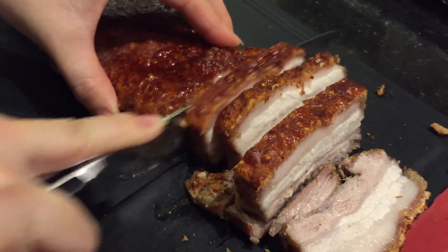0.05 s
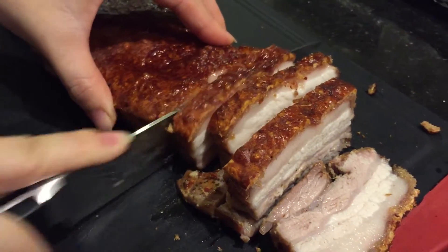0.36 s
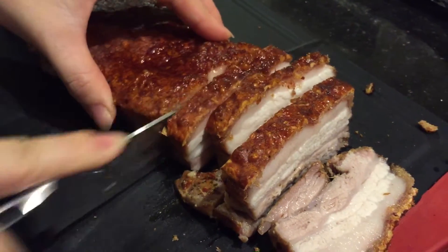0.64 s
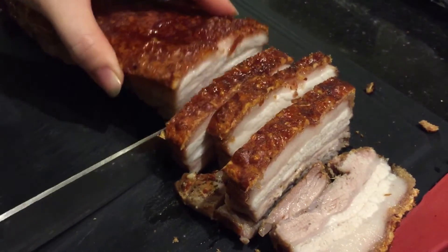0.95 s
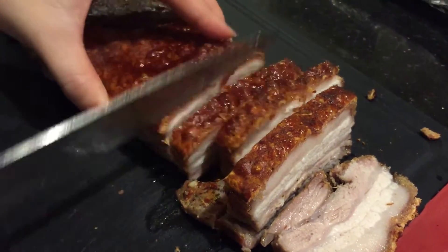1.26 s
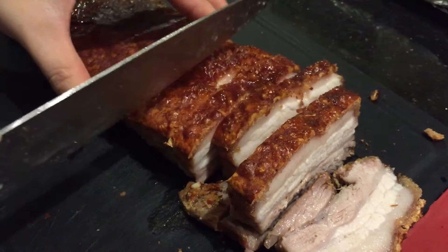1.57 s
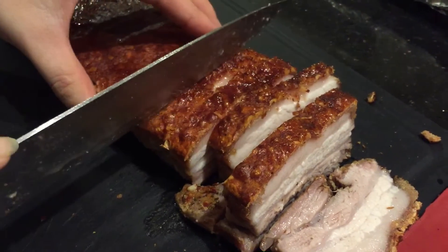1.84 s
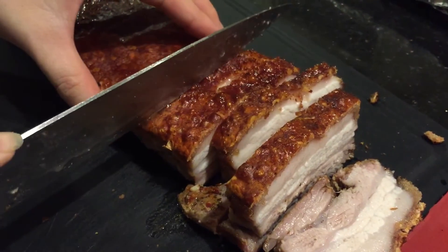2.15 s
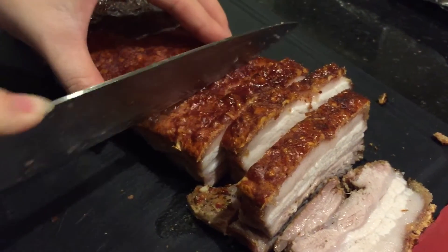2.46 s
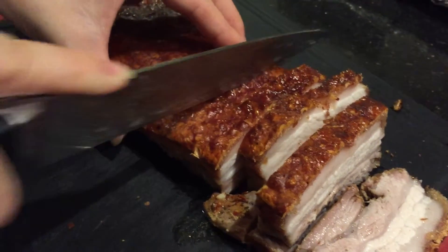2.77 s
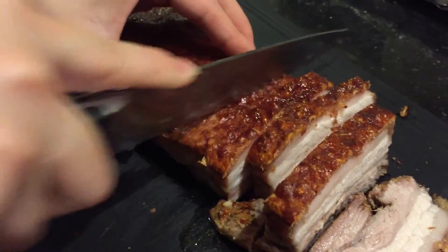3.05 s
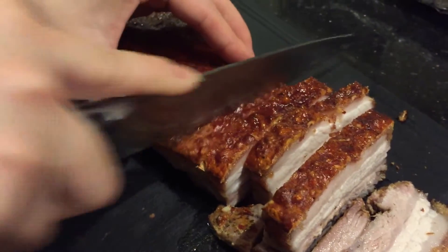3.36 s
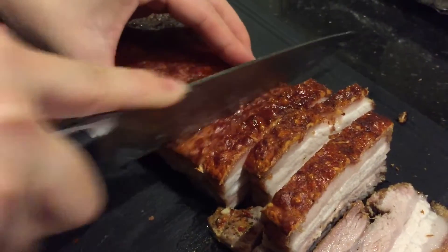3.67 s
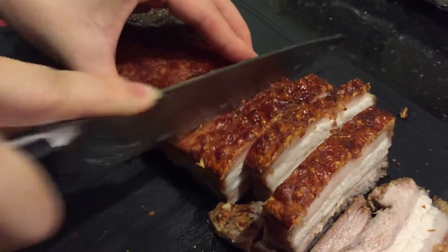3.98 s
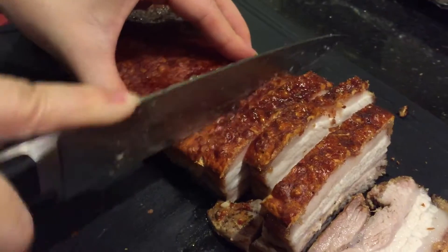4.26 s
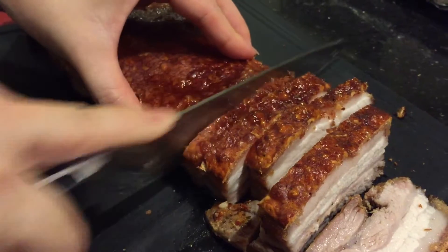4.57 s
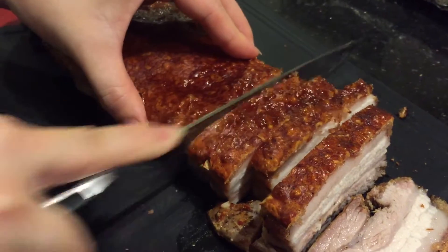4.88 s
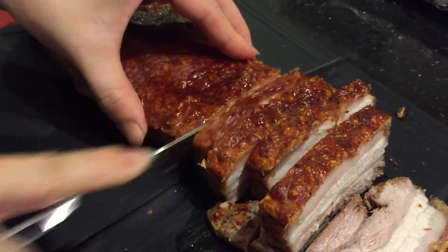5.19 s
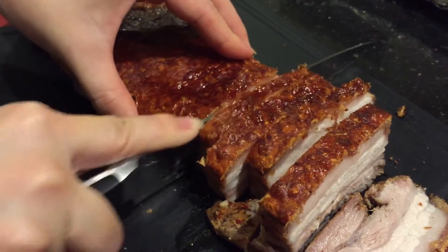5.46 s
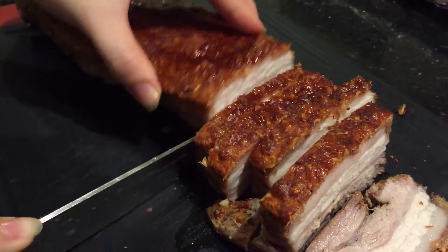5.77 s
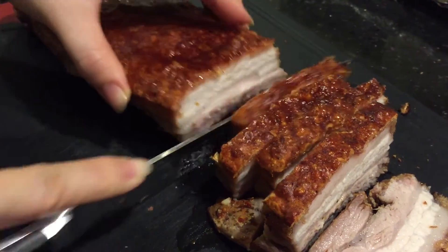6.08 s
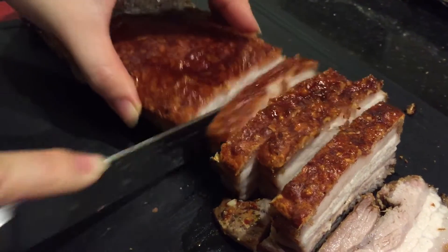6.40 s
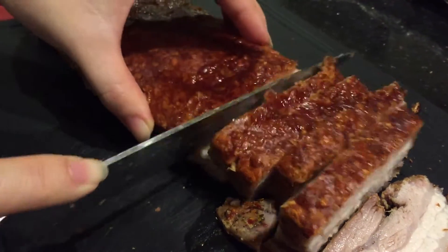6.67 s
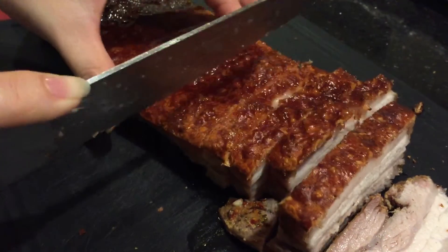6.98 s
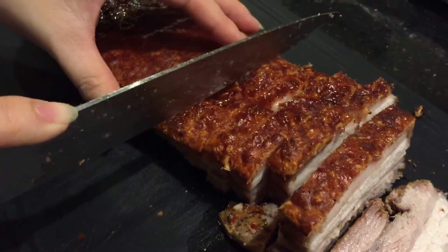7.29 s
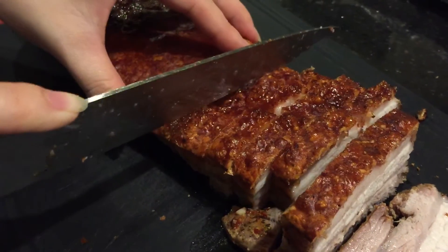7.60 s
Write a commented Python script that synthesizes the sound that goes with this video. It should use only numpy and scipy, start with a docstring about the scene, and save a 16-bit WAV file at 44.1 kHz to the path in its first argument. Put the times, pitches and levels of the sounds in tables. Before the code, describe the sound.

Close, brittle crunching as a kitchen knife slices roast pork crust, with soft moist strokes, light board knocks and blade taps.

```python
"""A home kitchen, close to a cutting board: a large knife saws through crisp pork crackling.
The blade goes to and fro about three times a second. The crust fails by brittle fracture, in snaps and
crunch; then the strokes slide through soft meat and along the board, with stick-slip friction.
Impacts excite the damped modes of steel and wood, and the edge is set on the crust for the next slice.
A low appliance hum fills the room."""
import sys
import numpy as np
from scipy import signal
from scipy.fft import rfft, irfft, next_fast_len
from scipy.io import wavfile

SR = 44100
rng = np.random.default_rng(int(sys.argv[2]) if len(sys.argv) > 2 else 0)


def persist_wave(psi):
    """Save psi, clipped to +-1, as 16-bit WAV."""
    counts = np.round(np.clip(psi, -1, 1) * 32767).astype(np.int16)
    wavfile.write(sys.argv[1], SR, np.atleast_2d(counts).T)


N = 336924
TIME = np.arange(N) / SR
BODY_EDGE_HZ, FIZZ_EDGE_HZ = 2500, 7500   # three registers: body below, bite between, fizz above

# spectrum of the appliance rumble: f/Hz, relative density/dB
RUMBLE_SPECTRUM = [(20, -32), (40, -18.5), (60, -9.5), (95, -8.5), (130, 0), (170, 2), (220, -1.5),
                   (330, -9), (520, -17), (1200, -17), (2200, -24.5), (5000, -30), (10000, -36),
                   (16000, -37)]
# narrow bands of appliance drone: f/Hz, width/Hz, level/dB
DRONE_BANDS = [(91, 12, -70.5), (155.5, 14, -65), (169.6, 8, -61), (287, 9.9, -70), (346.2, 6.7, -74),
               (414.8, 62, -69)]
# faint tones from elsewhere in the kitchen: start/s, end/s, f/Hz, level/dB
WHINES = [(2.27, 2.542, 346, -55), (3.28, 3.605, 345, -55.5), (6.86, 7.19, 409.3, -56),
          (7.33, 7.8, 408, -53)]
# strokes through meat and over the board:
# t at top speed/s, relative bite level/dB, duration/s, body re bite/dB, fizz re bite/dB
SLIDE_STROKES = [(0.02, -45, 0.17, -1.5, -2), (0.182, -54, 0.19, 3, 0), (0.351, -54.5, 0.21, -1, -5.5),
                 (0.534, -56, .17, 4, -6.5), (0.803, -60, 0.51, 1, 1.5), (1.105, -65.5, 0.54, -18, -8.5),
                 (1.32, -61.5, 0.12, 3.5, 5.5), (4.63, -48.5, .32, -9.5, -4.5),
                 (4.798, -46, 0.12, -3.5, -3), (4.976, -56, 0.24, -3, 1), (5.129, -49, .15, 1, -1),
                 (5.303, -51, 0.16, -2, -4), (5.465, -57, 0.21, 0, -7), (5.721, -52.5, 0.28, 0.5, -5.5),
                 (6.13, -69, .3, 12, 3), (6.441, -69.5, 0.22, 17.5, 0)]
# resonances of the wet slit between blade and meat, at half speed: f/Hz, width/Hz, relative level/dB
SLIT_MODES = [(977, 69, -6.5), (1448, 130, 0), (1840, 82, -2.5), (3516, 340, 6.5), (4190, 230, 7.5)]
# squeals of the blade drawn out of the cut: t/s, f/Hz, level/dB, Gaussian width/s
SQUEALS = [(0.837, 2950, -61.5, 0.028), (.967, 4350, -61, 0.043), (1.08, 2380, -67.5, 0.16)]
# bursting blisters of crust: t/s, relative bite level/dB, body re bite/dB, fizz re bite/dB
BLISTERS = [(0.0262, -35, -21, 7), (0.16, -51, 4, 8), (0.367, -50.5, -8, -5), (2.34, -42.5, -12, -1),
            (2.389, -45, -12, 3.5), (2.4586, -30, -6, 5), (2.505, -44, -3.5, 1), (2.562, -43, -5, 9),
            (2.5758, -40.5, -1.5, 13), (2.5956, -32.5, 0.5, 14.5), (2.6235, -41.5, 0.5, 10),
            (2.662, -39, -15, 12), (2.75, -43.5, -22, 3.5), (2.7672, -45.5, -22, 6),
            (2.8067, -28, -14.5, 4.5), (2.8598, -23, -3.5, -6.5), (2.9206, -37, -15, 7.5),
            (3.0275, -27.5, -12.5, 5.5), (3.092, -35.5, -5.5, 1), (3.1026, -33.5, -11.5, 5.5),
            (3.1338, -13, -7, -4.5), (3.1646, -32, -13, 5), (3.1692, -28.5, -13.5, 2.5),
            (3.1846, -24, -13, 3.5), (3.2208, -51, -8, 3), (3.2774, -40.5, -14, -6), (3.288, -32.5, -10, 2),
            (3.2985, -25.5, -13, 8), (3.3113, -22, -7.5, -1), (3.326, -23, -16, 1), (3.4364, -27, -11, 2.5),
            (3.49, -28, -4.5, -12), (3.5995, -27, -8, -2), (3.707, -41.5, -10.5, -1),
            (3.7322, -32.5, 1.5, 6.5), (3.7465, -26, -1, 8), (3.785, -24.5, -14.5, 9),
            (3.8044, -15.5, -14, -3), (3.8645, -24.5, -7.5, 5.5), (3.928, -34.5, -21.5, 4),
            (4.1014, -35.5, -9, 4), (4.1408, -22, -21.5, -5), (4.1613, -17.5, -5, 2.5),
            (4.2654, -40.5, -20, 9), (4.415, -28.5, -11.5, 10.5), (4.432, -36.5, -14, 12),
            (4.491, -27, -13, 4.5), (4.5014, -23.5, -20.5, 4), (4.5182, -26.5, -1.5, 7),
            (4.528, -19, -16, -7), (5.3427, -44.5, -14, 8.5), (5.8146, -50, -9, 2.5), (6.179, -54.5, -1, 7),
            (6.4295, -67, -9, 23.5), (6.7272, -60, -15, 12), (6.9872, -57, 0, -6), (7.476, -51, -8, 8),
            (7.492, -40, -7, 8.5), (7.5312, -35, -12, 5.5), (7.614, -40.5, -14, 15.5)]
# resonances of the blade wedged in the crust: f/Hz, width/Hz, boost/dB
WEDGE_MODES = [(1754, 77, 8.5), (3254, 180, 13), (4155, 400, 7.5), (5740, 1200, 7), (9530, 500, 3),
               (13100, 910, 3.5), (15200, 420, 9)]
# knocks of knife and meat on the board: t/s, level/dB
KNOCKS = [(.0286, -42.5), (.1776, -41.5), (1.335, -44), (2.1655, -50.5), (2.4591, -42), (2.5951, -41),
          (2.8068, -33.5), (2.8603, -38), (3.1347, -27.5), (3.747, -33.5), (4.1614, -33.5), (6.387, -46),
          (6.392, -45), (6.409, -48.5), (7.533, -42.5), (7.6138, -38.5)]
# modes of the board: f/Hz, relative level/dB, T60/s
BOARD_MODES = [(422, -8, .05), (580, -11, .033), (790, -1.5, 0.02), (963, -6.5, 0.068), (1230, -4.5, .04),
               (1820, 0, .04), (2522, -10, .029), (3200, -4, .028)]
# the blade's weight coming down through the meat: t/s, level/dB, Gaussian width/s
THUDS = [(.03, -60.5, 0.061), (3.185, -57.5, 0.068), (3.75, -62.5, 0.08), (4.146, -55.5, .045),
         (4.536, -45.5, 0.022), (4.8, -50.5, 0.038)]
# taps of the edge on hard crust: t/s, level/dB
TAPS = [(1.3732, -46.5), (2.048, -60.5), (2.1655, -48.5), (2.389, -63), (2.4591, -42), (7.3624, -44.5),
        (7.4619, -40), (7.4918, -33), (7.5324, -30)]
# modes of the steel blade: f/Hz, relative level/dB, T60/s
BLADE_MODES = [(3160, -30, .06), (4110, -6.5, 0.062), (4800, -13, 0.064), (5879, -16, .06),
               (6684, -14, 0.069), (7780, -11, 0.061), (8900, -15, 0.067), (9900, -12, 0.057),
               (11330, -5, 0.054), (13300, 2, .04), (15000, -4, .052)]
# strokes through the crust: t at top speed/s, level/dB, rise/s, fall/s
SAW_STROKES = [(2.35, -55.5, 0.075, 0.17), (2.48, -52.5, 0.043, 0.15), (2.6, -38.5, 0.049, 0.063),
               (2.67, -55, 0.045, 0.22), (2.83, -40, 0.054, 0.19), (3.035, -44.5, 0.063, 0.033),
               (3.17, -29.5, 0.11, 0.14), (3.32, -35, 0.044, 0.097), (3.485, -33, .1, 0.089),
               (3.636, -33.5, 0.078, 0.076), (3.764, -29, 0.05, 0.15), (3.95, -34.5, 0.065, .1),
               (4.147, -28.5, .11, 0.065), (4.31, -37, 0.2, 0.085), (4.506, -28.5, .12, 0.067)]
# spectrum of the crunch ahead of the wedge resonances: f/Hz, relative density/dB
CRUNCH_SPECTRUM = [(100, -7), (300, -7), (800, -5.5), (1500, -5), (2300, -3), (3200, -6), (5000, -4.5),
                   (6800, -3.5), (8200, -2), (10500, -3.5), (12000, 1), (16000, -7.5)]
# envelope of the greasy blade peeling off the meat: t/s, level/dB
PEEL_ENVELOPE = [(6.48, -81), (6.57, -57), (6.66, -64.5), (6.73, -57.5), (6.9, -72), (7.35, -91.5)]


def from_db(db):
    """Amplitude ratio: a factor of ten per 20 dB."""
    return 10 ** (np.asarray(db) / 20)


def rms_one(x):
    """Normalisation to rms 1."""
    return x / np.sqrt(np.mean(x ** 2) + 1e-20)


def add(out, sound, s):
    """Superposition of a short sound, starting at s seconds."""
    at = int(s * SR)
    out[at:at + len(sound)] += sound[:N - at]


def band(x, edges_hz, kind, order=2):
    """Causal Butterworth filtering."""
    return signal.sosfilt(signal.butter(order, edges_hz, kind, fs=SR, output="sos"), x)


def registers(x, lowest_hz):
    """Band splitting into body, bite and fizz."""
    body = band(band(x, lowest_hz, "high", order=1), BODY_EDGE_HZ, "low", order=4)
    bite = band(x, [BODY_EDGE_HZ, FIZZ_EDGE_HZ], "band", order=3)
    return body, bite, band(x, FIZZ_EDGE_HZ, "high", order=4)


def colour(x, spectrum):
    """Spectral shaping by a curve interpolated in log frequency."""
    hz, db = np.transpose(spectrum)
    size = next_fast_len(N)
    log_hz = np.log(np.arange(size // 2 + 1) * SR / size + 1)
    gain = from_db(np.interp(log_hz, np.log(hz), db))
    return irfft(rfft(x, size) * gain, size)[:N]


def drift(rate_hz):
    """Low-pass noise: a slow random wander of rms 1."""
    step, settle = 20, 4000
    pole = np.exp(-2 * np.pi * rate_hz * step / SR)
    noise = rng.standard_normal(N // step + settle + 2)
    slow = signal.lfilter([1], [1, -2 * pole, pole * pole], noise)[settle:]
    return np.interp(np.arange(N) / step, np.arange(len(slow)), rms_one(slow))


def narrow_noise(hz, width_hz):
    """Narrow-band noise, wavering as its components beat; rms 1."""
    edges_hz = [hz - width_hz / 2, hz + width_hz / 2]
    return rms_one(band(rng.standard_normal(N + SR), edges_hz, "band")[SR:])


def swell(s, width_s):
    """Gaussian envelope centred on s seconds."""
    return np.exp(-.5 * ((TIME - s) / width_s) ** 2)


def stroke(s, rise, fall):
    """Reciprocating motion: blade speed goes from rest to 1 and back in two quarter cosines."""
    phase = (TIME - s) / np.where(TIME < s, rise, fall)
    return np.where(np.abs(phase) < 1, np.cos(np.pi / 2 * phase), 0)


def grains(per_s, spread_db, t60, spike):
    """Poisson process of tiny ruptures, mostly weak, each a click and a decaying puff; rms 1."""
    sizes = from_db(spread_db * np.minimum(rng.exponential(1, N), 4)) * rng.choice([-1, 1], N)
    clicks = sizes * (rng.random(N) < per_s / SR)
    energy_decay = from_db(-60 / (t60 * SR)) ** 2
    energy = signal.lfilter([1], [1, -energy_decay], clicks ** 2 + 1e-18)
    return rms_one(spike * clicks + np.sqrt(energy) * rng.standard_normal(N))


def appliances(rumble_db, fade_s):
    """Background noise: broadband rumble, narrow-band drone and phase-modulated whines."""
    rumble = from_db(rumble_db) * rms_one(colour(rng.standard_normal(N), RUMBLE_SPECTRUM))
    drone = sum(from_db(db) * narrow_noise(hz, width_hz) for hz, width_hz, db in DRONE_BANDS)
    waver = .5 * drift(4)
    whines = np.zeros(N)
    for start, end, hz, db in WHINES:
        fade = np.clip(np.minimum(TIME - start, end - TIME) / fade_s, 0, 1)
        whines += from_db(db) * fade * np.sin(2 * np.pi * hz * TIME + waver)
    return rumble + drone + whines


def squelch(patchy_db, count=30):
    """Friction noise: the patches that cling keep changing, so bands swell and fade independently."""
    noise = rng.standard_normal(N)
    edges_hz = np.linspace(np.sqrt(450), np.sqrt(16500), count + 1) ** 2
    bands = (band(np.roll(noise, k * SR // 100), edges_hz[k:k + 2], "band") for k in range(count))
    return rms_one(sum(b * from_db(patchy_db * drift(21.3)) for b in bands))


def slit(speed, patchy_db, glide):
    """Cavity resonance: the wet slit sings, higher the faster the blade drags through it; rms 1."""
    song = sum(from_db(db + patchy_db * drift(28)) * narrow_noise(hz, width_hz)
               for hz, width_hz, db in SLIT_MODES)
    pitch_ratio = 1 + glide * (speed - .5)
    return rms_one(np.interp(np.cumsum(pitch_ratio), np.arange(N), song))


def sliding(gain_db, judder_db, speed_power):
    """Stick-slip friction: moist meat grips and frees the blade in a rub with ticks and faint squeals."""
    speeds = [stroke(s, length / 2, length / 2) for s, _, length, _, _ in SLIDE_STROKES]
    rub = squelch(patchy_db=3.9)
    song = from_db(-8.5) * slit(sum(speeds), patchy_db=5.5, glide=.14)
    ticks = from_db(-5.5) * grains(per_s=220, spread_db=5.5, t60=.005, spike=4)
    friction = band(rub + song + ticks, 6400, "low", order=1)
    body, bite, fizz = map(rms_one, registers(friction, lowest_hz=450))
    strokes = np.zeros(N)
    for speed, (_, db, _, body_db, fizz_db) in zip(speeds, SLIDE_STROKES):
        timbre = from_db(body_db) * body + bite + from_db(fizz_db) * fizz
        strokes += from_db(db) * speed ** speed_power * timbre
    squeals = sum(from_db(db) * swell(s, width_s) * narrow_noise(hz, 380) * from_db(3 * drift(30))
                  for s, hz, db, width_s in SQUEALS)
    return from_db(gain_db + judder_db * drift(45)) * strokes + squeals


def snap(t60, spike, flake_db):
    """Brittle fracture: a sharp release, a decaying shatter, three ringing flakes, a blade reflection."""
    t = TIME[:SR // 20]
    shatter = rng.standard_normal(len(t)) * from_db(-60 * t / t60)
    shatter[0] += spike * rng.choice([-1, 1])
    flakes_hz = rng.uniform([2800, 6000, 10500], [6000, 10500, 15000])
    flakes = sum(signal.lfilter(*signal.iirpeak(hz, Q=8, fs=SR), shatter) for hz in flakes_hz)
    direct = shatter + from_db(flake_db) * flakes
    delay_s = rng.uniform(.0002, .0008)
    return direct + .5 * np.interp(t - delay_s, t, direct, left=0)


def wedge(x):
    """Resonance: the blade wedged in the crust reinforces fixed bands of a fracture."""
    for hz, width_hz, boost_db in WEDGE_MODES:
        resonance = signal.lfilter(*signal.iirpeak(hz, hz / width_hz, fs=SR), x)
        x = x + (from_db(boost_db) - 1) * resonance
    return x


def cracks(fractures, gain_db, t60):
    """Acoustic emission: the crust bursts piece by piece, each with its own body, bite and fizz."""
    out = np.zeros(N)
    attack = int(.005 * SR)   # the first 5 ms set each register's level
    for s, db, body_db, fizz_db in fractures:
        stretch = np.exp(.28 * rng.uniform(-1, 1))
        free = rng.uniform(0, .38)   # share that escapes the wedge resonances
        burst = snap(t60 * stretch, spike=2.2, flake_db=1)
        parts = registers(free * burst + (1 - free) * wedge(burst), lowest_hz=465)
        crack = sum(from_db(part_db) * part / np.std(part[:attack])
                    for part_db, part in zip((body_db, 0, fizz_db), parts))
        add(out, from_db(db + gain_db) * crack, s)
    return out


def strike(blows, modes, spread_db, scuff_db, scuff_t60):
    """Modal vibration of board or blade: each impact gives a scuff and excites every damped mode."""
    out = np.zeros(N)
    t = TIME[:SR // 4]
    scatter_db = spread_db * rng.standard_normal((len(blows), len(modes)))
    for (s, db), offsets_db in zip(blows, scatter_db):
        scuff = rms_one(band(rng.standard_normal(len(t)), [modes[0][0], modes[-1][0]], "band"))
        sound = scuff * from_db(scuff_db - 60 * t / scuff_t60)
        for k, (hz, mode_db, t60) in enumerate(modes):
            envelope = from_db(mode_db + offsets_db[k] - 60 * t / t60)
            sound += (-1) ** k * envelope * np.sin(2 * np.pi * hz * t)
        add(out, from_db(db) * sound, s)
    return out


def thuds():
    """Forced vibration: board and worktop give a soft, deep bump under the hand's push."""
    push = sum(from_db(db) * swell(s, width_s) for s, db, width_s in THUDS)
    bump = narrow_noise(75, width_hz=65) + from_db(-5) * narrow_noise(220, width_hz=140)
    return push * bump


def sawing(grit_db, crumb_db, speed_power):
    """Abrasion: the edge grinds off dense grit and sparser crumbs, louder as a power of its speed."""
    envelope = sum(from_db(db) * stroke(s, rise, fall) ** speed_power for s, db, rise, fall in SAW_STROKES)
    grit = from_db(grit_db) * grains(per_s=2200, spread_db=3.2, t60=.003, spike=2.8)
    crumbs = from_db(crumb_db) * grains(per_s=150, spread_db=6, t60=.01, spike=1.6)
    return envelope * rms_one(wedge(colour(grit + crumbs, CRUNCH_SPECTRUM)))


def chips(per_s, level_db, spread_db, body_db, fizz_db):
    """Random fracture: small chips fly while the edge saws the crust; rows as in BLISTERS."""
    start, end = SAW_STROKES[0][0], SAW_STROKES[-1][0]
    return [(rng.uniform(start, end), level_db + spread_db * rng.uniform(-1, 1), body_db, fizz_db)
            for _ in range(int(per_s * (end - start)))]


def peeling():
    """Adhesive failure: threads of fat part with sparse, tiny ticks as the blade lifts out."""
    s, db = np.transpose(PEEL_ENVELOPE)
    envelope = from_db(np.interp(TIME, s, db, left=-120, right=-120))
    ticks = grains(per_s=170, spread_db=3.6, t60=.006, spike=2)
    return envelope * rms_one(band(ticks, 5200, "high", order=1))


def kitchen(x, wet_db, t60, treble_t60):
    """Reverberation: diffuse reflections of a small room decay exponentially, the treble sooner."""
    t = TIME[:SR // 2]
    noise = rng.standard_normal(len(t))
    dull = band(noise, 6000, "low", order=1)
    tail = dull * from_db(-60 * t / t60) + (noise - dull) * from_db(-60 * t / treble_t60)
    tail *= t > .004   # delay of the first reflection
    return x + from_db(wet_db) * signal.oaconvolve(x, tail / np.linalg.norm(tail))[:N]


def scene():
    """Superposition of crust, meat, blade and board in the room, over the appliance hum."""
    small_chips = chips(per_s=8, level_db=-47.5, spread_db=5.5, body_db=-10.5, fizz_db=4)
    snaps = cracks(BLISTERS + small_chips, gain_db=-1.5, t60=.014)
    crunch = sawing(grit_db=-4, crumb_db=-5.5, speed_power=2.01)
    meat = sliding(gain_db=-3, judder_db=1.5, speed_power=1.8) + peeling()
    steel = strike(TAPS, BLADE_MODES, spread_db=2, scuff_db=2, scuff_t60=.016)
    board = strike(KNOCKS, BOARD_MODES, spread_db=2.5, scuff_db=-3.5, scuff_t60=.04) + thuds()
    room = kitchen(snaps + crunch + meat + steel + board, wet_db=-16, t60=.26, treble_t60=.18)
    return (room + appliances(rumble_db=-56, fade_s=.062))[None]


def record(dry):
    """Saturation and band limiting: peaks are rounded, the deepest bass and the very top are cut."""
    steep_lowpass = signal.ellip(10, .2, 70, 15900, fs=SR, output="sos")
    return signal.sosfilt(steep_lowpass, band(np.tanh(dry), 36, "high"))


dry = scene()
out = record(dry)
persist_wave(out)
```